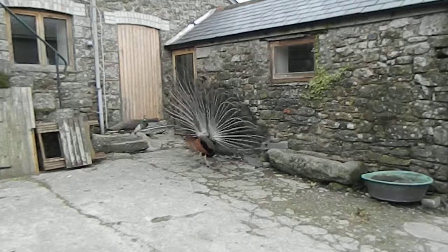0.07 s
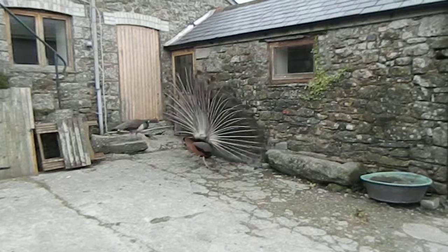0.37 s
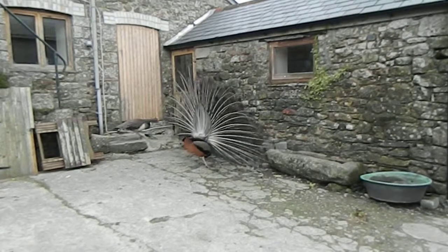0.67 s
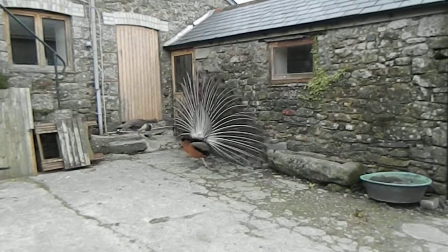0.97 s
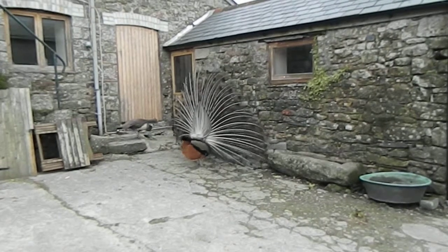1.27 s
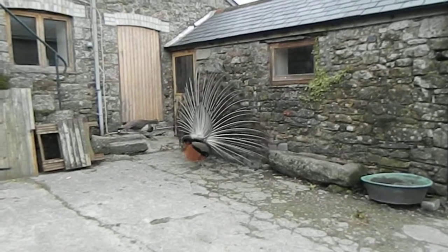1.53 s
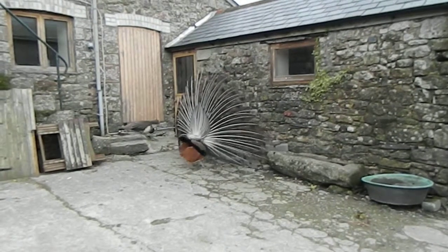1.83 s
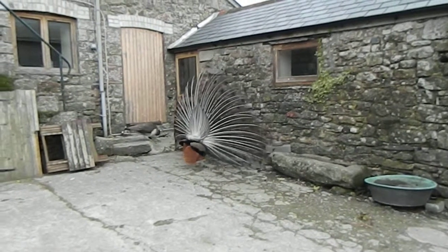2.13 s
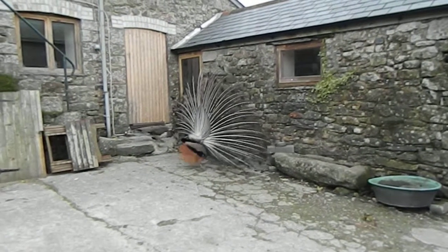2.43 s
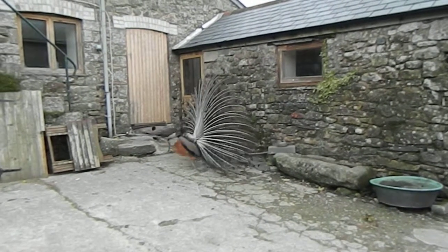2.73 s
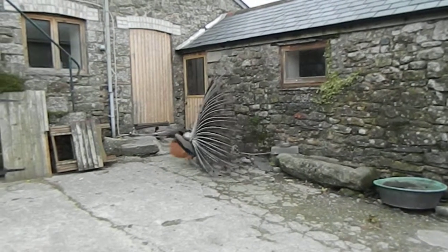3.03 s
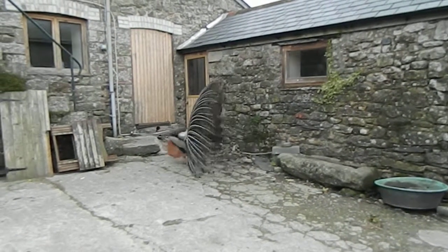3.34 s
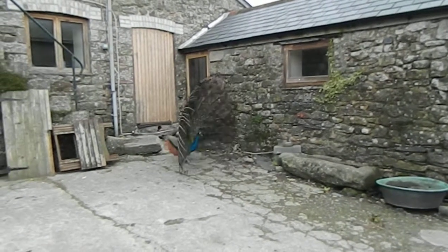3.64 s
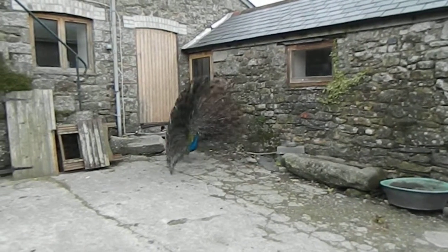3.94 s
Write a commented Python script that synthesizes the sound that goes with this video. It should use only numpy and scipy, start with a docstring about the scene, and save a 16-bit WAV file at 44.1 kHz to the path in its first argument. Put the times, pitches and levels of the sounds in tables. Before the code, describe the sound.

Sparrows chirp and a jackdaw calls once over soft wind rumble in a farmyard.

```python
"""A stone-walled farmyard. A jackdaw calls once and sparrows chirp: each voice is a gliding tone
from the syrinx, filtered by the vocal tract and returned by the walls as echoes and reverberation.
A displaying peacock rustles its train and steps on grit, both heard as bursts of band-limited noise.
Behind them soft wind rumbles over a faint hiss, a low hum and one low swell."""
import sys
import numpy as np
from scipy import signal
from scipy.fft import rfft, irfft, next_fast_len
from scipy.io import wavfile
from scipy.ndimage import uniform_filter1d, map_coordinates

SR = 44100
rng = np.random.default_rng(int(sys.argv[2]) if len(sys.argv) > 2 else 0)


def materialize(psi):
    """Save the field psi as 16-bit PCM at rate SR to the path in sys.argv[1].

    A 1-D psi becomes a single channel; in a 2-D psi each row is a channel.
    """
    bounded = np.clip(np.atleast_2d(psi).T, -1, 1)
    quanta = np.round(bounded * 32767).astype(np.int16)
    wavfile.write(sys.argv[1], SR, quanta)


N = 176400

# gestures of sparrow song: (t/s from onset, f/Hz before the pitch ratio, level/dB, roughness 0-1)
CHIRP = [(0, 4810, -9, 0.693), (.07, 4585, -6, 0.512), (0.148, 4100, -12, 0.85)]
CHILIP = [(0, 3430, -16, 0.19), (.032, 4146, 1, .13), (0.042, 5500, -6, 0.16), (.05, 4300, -12, 0.16),
          (0.065, 5200, 4, .8), (.12, 3955, -2, 0.596), (.155, 4433, 1.5, 0.67)]
SQUEAL = [(0, 5300, -16, 0.58), (.02, 6000, -4, 0.18), (.032, 6250, -7, .15), (.04, 9060, -3, .4)]
CHEEP = [(0, 3820, -20, 0.59), (.009, 4640, -2.5, 0.13), (.022, 4610, -5, .15), (.03, 4980, -6.5, 0.18),
         (0.051, 4880, -1, .09), (.064, 4420, -6.5, 0.59), (.076, 3560, -19, 0.7)]
CHIP = [(0, 3520, -17, 0.89), (0.018, 4220, -3, .2), (.022, 4330, -10, 0.56), (.029, 5600, -1, .35),
        (.038, 3500, -8, 1)]
PIP = [(0, 4436, -16, 0.16), (.018, 4490, -0.5, 0.047), (0.032, 5000, -8.5, .08)]
TWITTER = [(0, 2873, -21, .2), (.025, 3150, -11.5, 0.16), (0.03, 4620, -7.5, 0.14), (.044, 4950, -7.5, .2),
           (.05, 5870, -12, 0.38), (0.055, 3950, -16, 0.22), (.068, 3810, -5, .12), (.076, 2210, -26, 0.73),
           (.085, 3550, -7, 0.17), (.111, 4000, -7, .25), (.117, 3300, -3, .08), (.128, 3126, -2.5, 0.055),
           (0.132, 2020, -27, .6), (.139, 3200, -1, .06), (.149, 3000, -1, .11)]
# a churr: a high rising note turning raspy, overlapped by a lower arching note
CHURR_HIGH = [(0, 2830, -14, 0.28), (.02, 3805, -3, .18), (.046, 4204, -5.5, 0.18), (.062, 4800, -7.5, .85),
              (.15, 4110, -11.5, 0.65)]
CHURR_LOW = [(0, 2610, -11, 0.36), (.034, 3108, -6.5, 0.18), (.06, 2760, 1.5, .25),
             (0.116, 2326, -13, 0.17)]


def jackdaw(start_s=0.579, direct_db=-23, reverb_db=-27.5):
    """Source and filter: throat resonances shape one raspy, falling call, which two walls reflect."""
    # gesture of the call: (t/s from onset, f/Hz before the pitch ratio, level/dB, roughness 0-1)
    chak = [(0, 1402, -3, 0.04), (.011, 1216, 1, 0.06), (.021, 1106, -3, 0.21), (.028, 959, -8.5, 0.23),
            (.042, 870, -4.5, .22), (.066, 735, -20.5, 0.44)]
    # response of the throat: (f/Hz, gain/dB)
    throat = [(850, -26.5), (1250, -10.5), (1700, 1), (2550, -5), (3100, -22), (4300, -32.5), (6400, -19.5),
              (7600, -30), (9800, -31.5), (15000, -59)]
    # wall reflections: (delay/s, level/dB, left-right/dB)
    walls = [(0.0284, 0.5, -2), (.054, -7, 2)]
    call = syrinx(start_s, chak, throat, 0.98, harmonics=5, flutter_hz=1190, jitter=0.23, rasp_db=20)
    echoes = sum(amp(db) * pan(side_db) * delayed(call, lag) for lag, db, side_db in walls)
    return amp(direct_db) * (pan(-6) * call + echoes) + amp(reverb_db) * yard(call)


def sparrows():
    """Multipath propagation: each chirp arrives directly, off two walls and as reverberation."""
    # syllables: (t/s, gesture, pitch ratio, direct level/dB, reverberant level/dB, left-right/dB)
    syllables = [(0.679, CHIRP, 0.9, -67, -43.5, 4), (0.946, CHILIP, 1.028, -45.5, -42, 1),
                 (1.194, SQUEAL, 1.06, -39.5, -41, 17), (1.225, CHEEP, 1.004, -26, -32, 9.5),
                 (1.271, CHIRP, 0.93, -37.5, -48, 5), (1.333, CHIP, 1.03, -29, -43, 8),
                 (1.795, CHURR_HIGH, 1.037, -44, -40.5, 5), (1.835, CHURR_LOW, 1.015, -38, -46, -4),
                 (1.911, CHIRP, 0.92, -38, -44, 3), (2.367, CHILIP, 1.0, -45.5, -43, 1),
                 (2.51, PIP, 1.05, -33, -39, 7), (2.591, CHIRP, 1.01, -39.5, -35.5, 7),
                 (3.125, CHIRP, 1.11, -44, -44, 9), (3.141, CHURR_HIGH, 0.99, -41.5, -42, 4),
                 (3.178, CHURR_LOW, 1.023, -36, -43.5, -4), (3.348, CHILIP, 1.057, -44, -41.5, 0),
                 (3.501, PIP, 1, -32, -42, 3), (3.735, SQUEAL, 0.99, -40, -41, 3),
                 (3.745, TWITTER, 1.002, -31, -41.5, 4)]
    # response of the beak: (f/Hz, gain/dB)
    beak = [(2200, -1.5), (2800, 2.5), (5000, -0.5), (6100, -4), (6700, -7), (15000, -22)]
    # wall reflections: (delay/s, level/dB)
    walls = [(.025, -18), (.056, -19)]
    out = np.zeros((2, N))
    for start, shape, ratio, direct_db, reverb_db, side_db in syllables:
        call = syrinx(start, shape, beak, ratio, harmonics=1, flutter_hz=703, jitter=0.1626, rasp_db=-6.5)
        echoes = sum(amp(db) * delayed(call, lag) for lag, db in walls)
        out += amp(direct_db) * (pan(side_db) * call + echoes) + amp(reverb_db) * pan(1) * yard(call)
    return out


def syrinx(start, gesture, tract, ratio, harmonics, flutter_hz, jitter, rasp_db):
    """Source-filter model: a randomly modulated gliding tone and a rasp pass through a fixed tract."""
    times, *columns = np.transpose(gesture)
    t = np.arange(int(times[-1] * SR)) / SR
    hz, db, rough = [np.interp(t, times, column) for column in columns]
    knots = rng.standard_normal((2, 2000))
    shake, tremor = [map_coordinates(row, [t * flutter_hz], mode="mirror") for row in knots]
    pitch = ratio * uniform_filter1d(hz, size=100) * (1 + jitter * rough * shake)
    phase = 2 * np.pi * np.cumsum(pitch) / SR
    tone = sum((k * pitch < SR / 2) * np.sin(k * phase) for k in range(1, harmonics + 1))
    rasp = amp(rasp_db) * rough * np.diff(rng.standard_normal(SR))[:len(t)]  # differencing brightens it
    flutter = (1 + rough * tremor) / np.hypot(1, rough)
    envelope = amp(db) * flutter * signal.windows.tukey(len(t), 0.06)
    call = np.sqrt(2) * (tone + rasp) * envelope
    placed = np.pad(call, (int(start * SR), N))[:N]
    return filtered(placed, lambda f: amp(along(tract, f)))


def peacock(grain_db=2, tick_decay_s=0.0045):
    """Friction and impact: the train rustles in grainy swells of noise, and grit ticks underfoot."""
    # feather rustles: (t/s of the peak, rise/s, fall/s, level/dB, centre f/Hz)
    rustles = [(.01, 0.058, 0.33, -40, 2730), (.012, .03, 0.33, -49, 12000),
               (1.222, 0.03, 0.047, -40, 4800), (1.371, 0.054, 0.017, -47.5, 4850),
               (2.8, 0.06, 0.078, -51, 7000)]
    # steps on grit: (t/s, level/dB, centre f/Hz)
    steps = [(2.073, -47, 7000), (2.169, -38, 1200), (2.176, -42.5, 2360), (2.208, -39.5, 1710)]
    t = np.arange(N) / SR
    out = np.zeros((2, N))
    for peak, rise, fall, db, hz in rustles:
        quills = unit(amp(grain_db * wobble(400)) * band(hz, octaves=0.92))
        envelope = np.exp(-np.maximum((peak - t) / rise, (t - peak) / fall))
        out += amp(db) * pan(1.5) * quills * envelope
    for start, db, hz in steps:
        envelope = (t >= start) * np.exp(-np.abs(t - start) / tick_decay_s)
        out += amp(db) * band(hz, octaves=0.74) * envelope
    return out


def yard(x, gap_s=0.0087, build_s=0.0059, width_db=-3):
    """Diffuse reflection: sound scattered by rough stone builds up after a gap, then decays by band."""
    # reverberation time: (f/Hz, T60/s)
    t60 = [(500, 0.48), (2000, 0.43), (5000, 0.45), (12000, 0.23)]
    hz, t, noise = signal.stft(rng.standard_normal((2, SR * 2 // 3)), SR, nperseg=256)
    build = 1 - np.exp(-np.maximum(t - gap_s, 0) / build_s)
    decay = amp(-60 * t / along(t60, hz)[:, None])
    mid, side = signal.istft(noise * build * decay, SR, nperseg=256)[1]
    tail = mid + amp(width_db) * np.array([side, -side])
    return signal.fftconvolve(x[None], tail / np.linalg.norm(tail[0]), axes=1)[:, :N]


def wind():
    """Amplitude modulation: the wind's low rumble slowly rises and falls."""
    # strength of the wind: (t/s, level/dB)
    strength = [(0, -36.5), (1.1, -34), (2.1, -36), (3.0, -37), (3.3, -36), (3.6, -38), (3.85, -37.5)]
    # spectrum of the rumble: (f/Hz, level/dB)
    rumble = [(30, -29), (60, -17.5), (80, -8.5), (118, -5.5), (158, 1.5), (200, -1.5), (285, -3.5),
              (350, -16), (520, -26), (900, -77)]
    t = np.arange(N) / SR
    return amp(np.interp(t, *np.transpose(strength))) * rush(rumble, patchy_db=1.5)


def hum(waver_rad=0.67):
    """Phase modulation: two faint sustained tones and one low swell waver at random."""
    # sustained tones: (f/Hz, level/dB)
    tones = [(48.5, -53.5), (438, -58.5)]
    # course of the swell: (t/s, f/Hz, level/dB)
    swell = [(.72, 199, -43), (.8, 194.7, -25.5), (0.919, 173.3, -33), (1.02, 191.5, -32),
             (1.149, 194.4, -37)]
    t = np.arange(N) / SR
    drone = sum(amp(db) * np.sin(2 * np.pi * hz * t + waver_rad * wobble(4.06)) for hz, db in tones)
    times, hz, db = np.transpose(swell)
    envelope = amp(np.interp(t, times, db)) * (t > times[0]) * (t < times[-1])
    phase = 2 * np.pi * np.cumsum(np.interp(t, times, hz)) / SR
    return np.sqrt(2) * drone + envelope * np.sin(phase + waver_rad * wobble(25.44))


def air(level_db=-46.5):
    """Ambient noise: the faint broadband hiss of the open air."""
    # spectrum of the hiss: (f/Hz, level/dB)
    hiss = [(250, -9), (420, 0.5), (700, -1), (1500, -10.5), (2400, -11), (3700, -17), (5300, -17.5),
            (7500, -24.5), (15500, -26)]
    return amp(level_db) * rush(hiss, patchy_db=1.5)


def rush(spectrum, patchy_db):
    """Partial coherence: stereo noise of rms 1 with patches of random gain, near mono in the bass."""
    # likeness of left and right: (f/Hz, correlation)
    coherence = [(50, 0.74), (200, 1), (1500, 0.54), (4000, 0.22), (9000, 0)]

    def mid_side_gains(hz):
        angle = np.arccos(np.clip(along(coherence, hz), -1, 1)) / 2
        return amp(along(spectrum, hz)) * [np.cos(angle), np.sin(angle)]

    noise = signal.stft(rng.standard_normal((2, N)), nperseg=512)[2]
    patches = uniform_filter1d(rng.standard_normal(noise.shape[1:]), 6, axis=0)  # smooth in frequency
    patches = uniform_filter1d(patches, 14, axis=1)  # and in time
    pair = signal.istft(noise * amp(patchy_db * unit(patches)), nperseg=512)[1][:, :N]
    mid, side = filtered(pair, mid_side_gains)
    return unit(np.array([mid + side, mid - side]))


def band(centre_hz, octaves):
    """Band-limited stereo noise of rms 1, Gaussian in log frequency."""
    hz = np.geomspace(50, SR / 2, 40)
    db = -10 / np.log(10) * (np.log2(hz / centre_hz) / octaves) ** 2
    return rush(np.transpose([hz, db]), patchy_db=0)


def wobble(rate_hz):
    """Smooth modulation: a spline through rate_hz random knots a second."""
    knots = rng.standard_normal(int(N * rate_hz / SR) + 4)
    return map_coordinates(knots, [np.arange(N) * rate_hz / SR])


def filtered(x, response):
    """Linear filtering: the spectrum of x times a frequency response."""
    size = next_fast_len(N + SR // 2)
    return irfft(rfft(x, size) * response(np.fft.rfftfreq(size, 1 / SR)), size)[..., :N]


def delayed(x, lag_s):
    """Propagation delay: x arrives lag_s later."""
    return np.pad(x, (int(lag_s * SR), 0))[:N]


def along(points, hz):
    """Interpolation of (f/Hz, value) points on a log frequency axis."""
    f, values = np.transpose(points)
    return np.interp(np.log(hz + 1), np.log(f + 1), values)


def pan(db):
    """Intensity panning: gains for a left-right level difference."""
    return amp([[db / 2], [-db / 2]])


def amp(db):
    """Decibels to amplitude ratio."""
    return 10 ** (np.asarray(db) / 20)


def unit(x):
    """Normalisation to rms 1."""
    return x / np.sqrt(np.mean(x ** 2) + 1e-20)


def scene():
    """Superposition: the birds add to a background that lies slightly to the right."""
    return sparrows() + jackdaw() + peacock() + pan(-2.5) * (wind() + hum()) + pan(-1) * air()


def record(dry, rolloff_hz=13500, limit_hz=15800):
    """Low-pass filtering: the microphone softens the top octave; nothing passes above the band limit."""
    return filtered(dry, lambda hz: (hz < limit_hz) / np.hypot(1, (hz / rolloff_hz) ** 6))


dry = scene()
out = record(dry)
materialize(out)
```